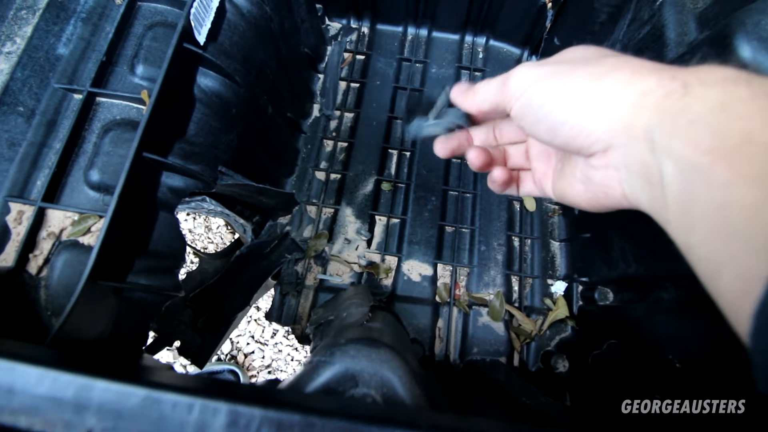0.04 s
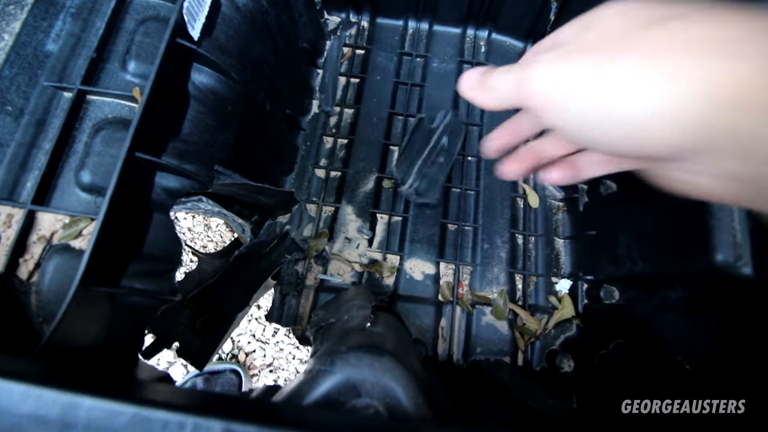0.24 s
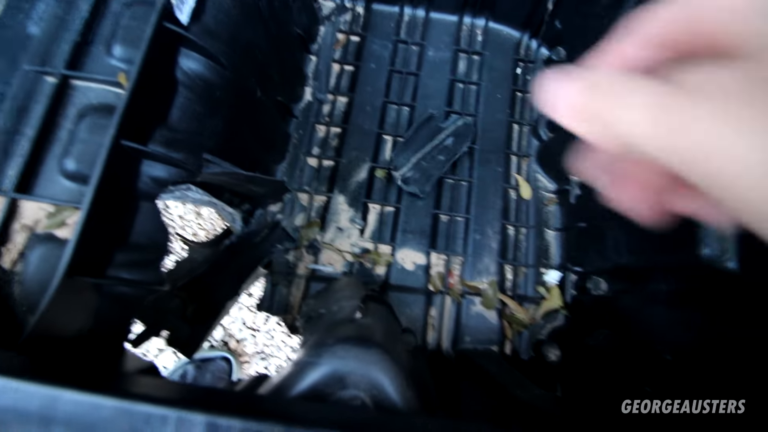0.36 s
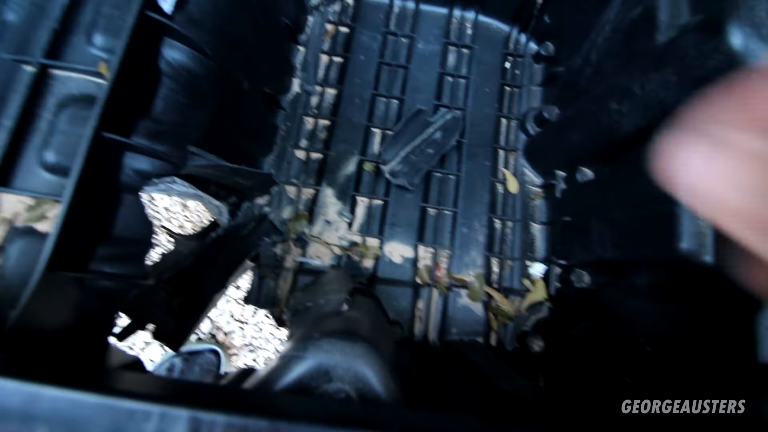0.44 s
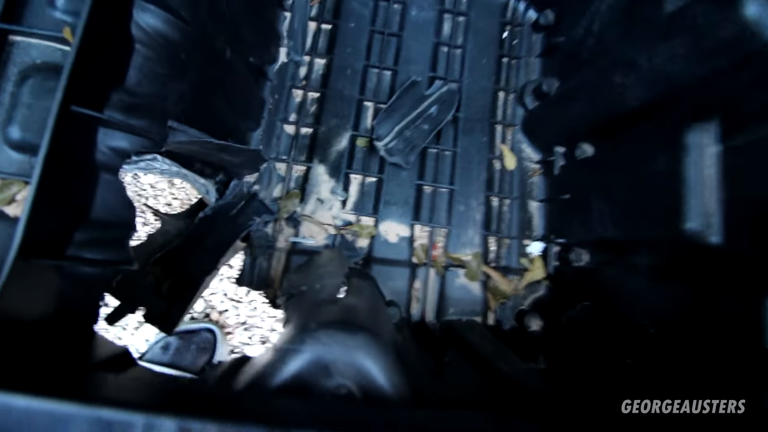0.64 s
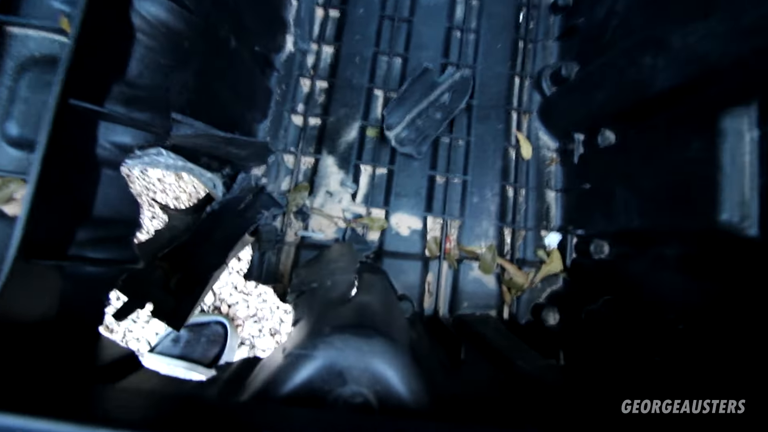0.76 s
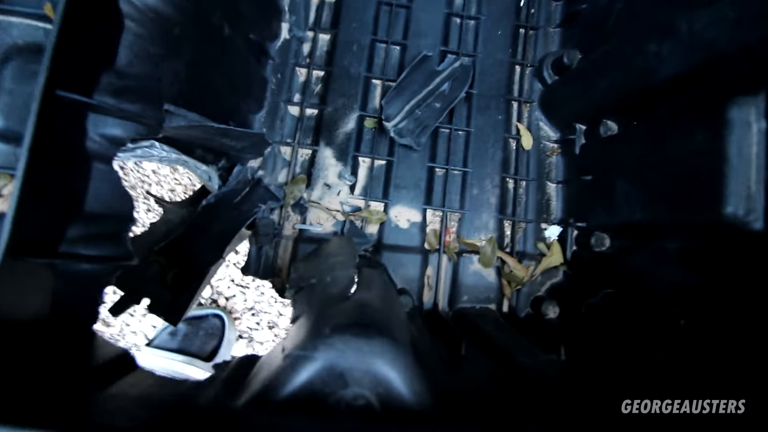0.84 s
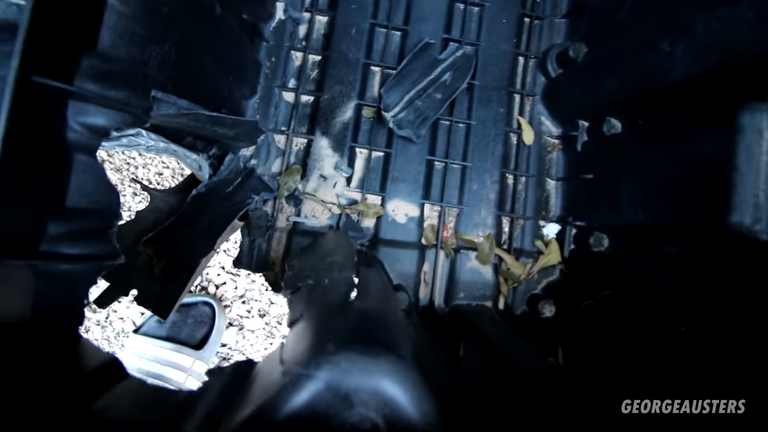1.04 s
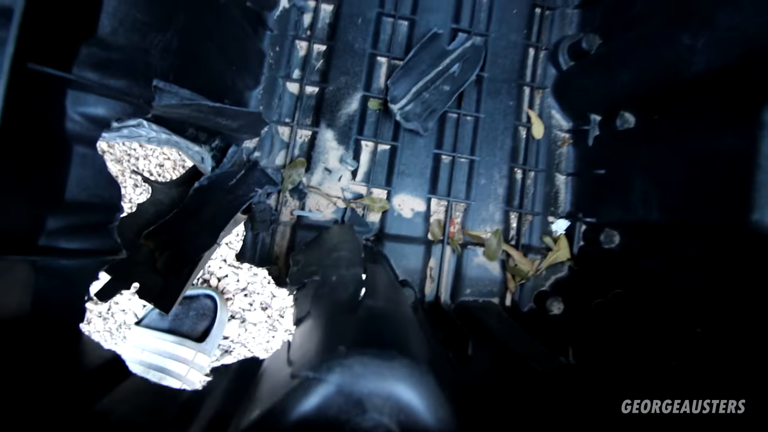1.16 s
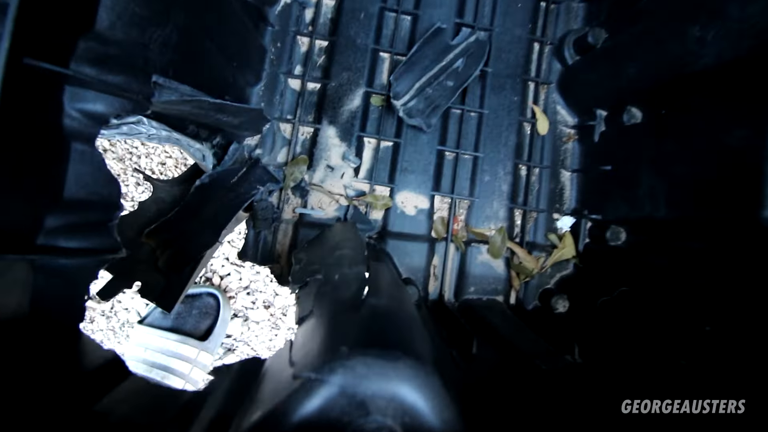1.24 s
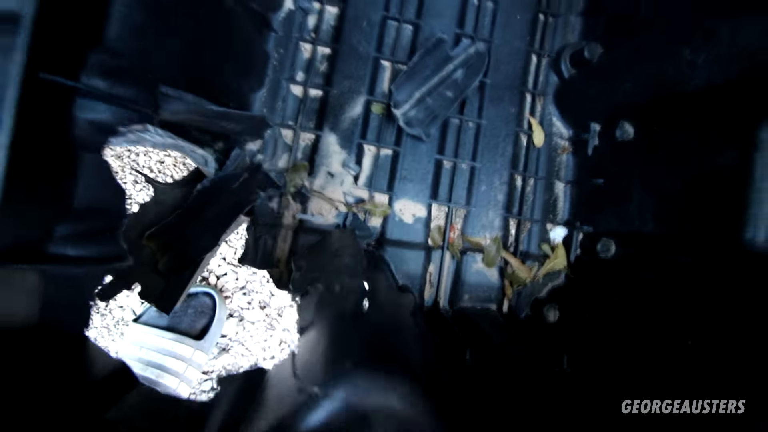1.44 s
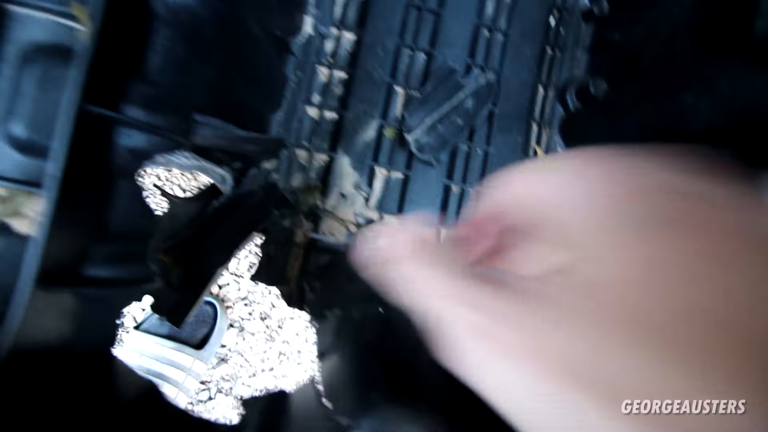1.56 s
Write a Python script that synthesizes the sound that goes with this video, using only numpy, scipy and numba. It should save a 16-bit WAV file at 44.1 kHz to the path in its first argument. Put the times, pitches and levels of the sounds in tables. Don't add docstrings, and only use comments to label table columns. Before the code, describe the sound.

A dropped plastic piece clatters on a hollow ribbed tray. Faint finger squeak and rub until 0.2 s; a loud, slightly overloaded boxy knock at 0.23; sharp, bright cracks and rattling bounces from 0.33 to 0.5, weaker dull taps fading by 0.75. Then quiet outdoor hush, faint low hum swelling near 1.2, slight sleeve rustle, and a soft hand thump and brushing from 1.4. Close, dry.

```python
import sys
import numpy as np
from scipy import signal
from scipy.io import wavfile
from scipy.ndimage import uniform_filter1d
from numba import njit

SR = 44100
rng = np.random.default_rng(int(sys.argv[2]) if len(sys.argv) > 2 else 0)


def store_wav(level_fs):
    pcm = np.round(np.clip(np.atleast_2d(level_fs), -1, 1) * 32767)
    wavfile.write(sys.argv[1], SR, pcm.T.astype(np.int16))


def gain_from_decibels(decibels):
    exponent = np.asarray(decibels, float) / 20
    return 10 ** exponent


N = 70560
T = np.arange(8192) / SR

# (time [s], boom level [dB], boom pitch [Hz], upper-mode level [dB], boom T60 [s])
KNOCKS = [(0.2294, 21, 410.2, -1.5, 0.042), (0.2521, -9, 390, -42, 0.057), (.266, -12, 406, -35.5, .05),
          (.287, -10.5, 413, -53, .05), (0.315, -20, 417, -57, 0.064), (0.3338, 1.5, 401, -14, 0.041),
          (0.352, 8, 440, -8, 0.044), (0.364, 0, 416, -15, 0.057), (.377, -5.5, 448, -19, .05),
          (.398, -17, 417, -35, 0.088), (0.417, -14, 404, -24.5, 0.047), (.437, -21.5, 391, -34.5, 0.074),
          (0.4609, -2.5, 410, -19, 0.046), (0.4676, -8, 398, -20, .05), (0.479, 7.5, 417.5, -6.5, 0.057),
          (0.517, -0.5, 451, -22, 0.066), (.529, -7, 449, -20, 0.09), (0.5381, -6.5, 425, -32, 0.063),
          (0.559, -17, 426, -37.5, 0.13), (0.5843, 0.5, 440, -22.5, 0.067), (0.5947, -6, 450, -30, 0.044),
          (0.6036, -9.5, 430, -29, 0.035), (0.6232, 1, 433.6, -24.5, 0.057),
          (0.6508, -6.5, 454, -34.5, 0.042), (0.6687, -6, 457, -38, 0.034), (.683, -10, 431, -36.5, 0.044),
          (0.7033, -20, 428, -47.5, 0.042), (0.7509, -30, 420, -38, 0.057)]
# (frequency [Hz], level re boom [dB], T60 [s])
LOW_MODES = [(116, -23, 0.072), (172.3, -17, 0.072), (270.3, -16.5, 0.092), (331.2, -13.5, 0.074),
             (475, -16.5, 0.072)]
# (frequency [Hz], level [dB], T60 [s])
UPPER_MODES = [(667, -12.5, 0.051), (752, -8, 0.12), (845, -6.5, 0.074), (898, -11, 0.046),
               (972, 11, 0.014), (1112, 2, 0.02), (1220, -12, 0.065), (1450, -15, 0.052),
               (1679, -3.5, 0.025)]
# (time [s], level [dB], pitch [Hz], T60 [s])
PINGS = [(.2296, 8.5, 1414, 0.0069), (.2299, 6, 3240, 0.0056), (.2301, 1, 820, .03), (.231, 0, 1068, 0.035),
         (.239, -8, 1220, 0.042), (.241, -24, 2600, 0.029), (.335, -11, 1090, 0.034),
         (.352, 2.5, 1215, 0.019), (0.3514, 1.5, 3480, .012), (0.363, -9, 5600, .012),
         (.367, -9.5, 2060, 0.021), (.3765, -20, 3640, 0.01), (.418, -21, 2620, 0.016),
         (0.4647, -6.5, 1180, 0.019), (.470, -24, 5350, 0.011), (.479, -6, 1160, 0.0095),
         (0.48, -17, 5400, 0.01), (0.4896, -3.5, 3180, 0.013), (.4893, -12, 4400, 0.0092),
         (0.489, -9, 7860, 0.014), (0.498, -17, 3040, 0.013), (.516, -22, 950, 0.033),
         (.529, -12, 910, 0.026), (.529, -24, 1190, .025), (.540, -21, 960, 0.027),
         (.5845, -13.5, 930, 0.037), (.584, -25, 1820, 0.019), (.592, -16, 720, 0.039),
         (.598, -28, 980, .03), (.624, -14.5, 887, 0.029), (.628, -23, 1130, 0.039),
         (.630, -17, 730, 0.034), (.637, -27, 800, 0.033), (.6515, -17.5, 848, 0.037),
         (.650, -28.5, 1157, 0.036), (.669, -19.5, 723, 0.035), (.683, -23.5, 904, 0.031),
         (.690, -26.5, 736, .03), (.739, -42, 1030, 0.022), (1.428, -30.5, 1890, 0.04),
         (1.458, -31, 1510, .035), (1.458, -34, 1010, 0.041), (1.4886, -31, 2020, 0.034),
         (1.502, -30, 2100, 0.036)]
# (time [s], level [dB],
# pitch [Hz], T60 [s])
THUMPS = [(.266, -8.5, 413, .1), (.287, -13.5, 417.3, 0.095), (.562, -18, 278, 0.07),
          (.706, -20, 300, 0.015), (.719, -28.5, 421, .1), (0.757, -24, 306, 0.11),
          (0.838, -30, 320, 0.055), (1.41, -20, 294, 0.027), (1.4234, -9, 274, 0.025),
          (1.447, -19.5, 430, 0.042), (1.496, -28, 154, 0.11), (1.505, -24, 243, 0.067),
          (1.543, -20.5, 145, 0.042)]
# (time [s], crack level [dB], rattle level [dB], tilt [dB per octave], rattle T60 [s])
CRACKS = [(0.2306, -12, -23, 6, 0.026), (0.301, -52, -48, 4, 0.39), (0.3342, -14.5, -20, 2, 0.033),
          (0.3516, 9.5, -2.5, -0.5, 0.041), (0.3642, 5.5, -5, 5, 0.035), (.376, -1.5, -16.5, -2.5, 0.054),
          (.4180, -22, -27.5, -7.5, 0.11), (0.4616, -11.5, -21, -3.5, 0.1), (0.4688, -30, -27, 0, 0.14),
          (0.4797, -5, -27, -34, 0.095), (0.4893, -5, -13, 4, 0.045), (0.499, -12, -38, -11, 0.03),
          (0.5167, -30, -24, -6, 0.051), (0.5274, -34, -24, -6.5, 0.039), (0.5392, -31, -41, -5, 0.15),
          (0.585, -26.5, -31, -1, 0.059), (0.594, -29, -40, -1, 0.26), (0.624, -39, -41.5, 2.5, 0.32),
          (0.651, -24, -34, -9, 0.05), (0.7025, -36, -45, -9, 0.053), (0.7523, -52, -38, -6, 0.041),
          (0.952, -37, -58, -6, 0.012)]
# (frequency [Hz], width [Hz], level [dB])
PIECE_MODES = [(1850, 160, 12), (2203, 170, 12.5), (2990, 740, 9.5), (3510, 520, 8), (4390, 130, 14),
               (5140, 800, 8), (5600, 250, -17), (6900, 250, 7.5), (7730, 47, 11), (9110, 1120, -4),
               (10470, 570, -8.5), (12400, 2200, -14)]
# (time [s], level [dB])
RUSTLE = [(0.72, -55), (0.742, -52.5), (0.756, -43), (0.768, -59), (0.776, -43.5), (0.812, -55),
          (0.836, -43.5), (0.91, -54), (0.916, -69), (0.984, -70), (1.09, -46), (1.122, -45.5),
          (1.136, -41.5), (1.152, -47), (1.346, -61), (1.442, -34), (1.552, -42), (1.6, -43)]
# (frequency [Hz], level [dB per Hz])
CLOTH = [(300, -9), (500, -12.5), (1400, -19), (2600, -15.5), (4500, -16), (7500, -19.5), (16000, -38.5)]
# (time [s], level [dB])
BRUSH = [
    (1.39, -52),
    (1.41, -48),
    (1.43, -33),
    (1.465, -28.5),
    (1.48, -56),
    (1.51, -32),
    (1.54, -61),
    (1.6, -70),
]
# (frequency [Hz], level [dB per Hz])
TRIM = [(150, -29), (300, 0), (700, -9), (1500, -10.5), (2100, -3), (2600, -17), (5000, -14.5),
        (16000, -26)]
# (time [s], level [dB])
SLIP = [
    (0, -49),
    (.022, -44),
    (.05, -47),
    (.105, -46),
    (.12, -42),
    (.145, -37),
    (.152, -45),
    (.19, -60),
    (.22, -93),
]
# (frequency [Hz], width [Hz], level [dB])
SQUEAK = [(2950, 240, -12), (4950, 82, -1.5), (6400, 72, -4), (7320, 46, -6)]
# (frequency [Hz], level [dB per Hz])
HUSH = [(30, -10), (133, -4), (260, -4), (1000, -12.5), (1650, -14.5), (2200, -24.5), (5000, -19),
        (14000, -41)]
# (time [s], level [dB])
HUM_SWELL = [
    (0, -3.5),
    (.8, -1.5),
    (.92, 2.5),
    (1.2, 6.5),
    (1.35, 2),
    (1.6, -7),
]

PUSH_S, BOOM_RISE_S, THUMP_RISE_S = 0.0011, 0.00077, 0.0048
PAIR_RATIO, PAIR_DB, PAIR_T60_S = 1.12, -17, 0.091
HARD_DAMP = 0.15
MODE_JITTER, LOW_SCATTER_DB, UPPER_SCATTER_DB = 0.035, 3.5, 4
CLATTER_DB, CLATTER_T60_S = -1.5, 0.059
NOTCH_HZ, NOTCH_WIDTH_HZ, NOTCH_DEPTH = 594.0, 272.0, 0.89
PING_RISE_CYCLES, PING_SAG, SAG_S = 0.88, 0.079, 0.011
CRACK_T60_S, TILT_HZ = 0.0081, 3500
HUSH_DB, HUM_HZ, HUM_DB, MIC_HISS_DB = -41.5, 131.7, -45.5, -56.5
MIC_LOW_HZ, SETTLE_HZ, TOP_HZ = 73.6, 40.5, 15750
LIMIT_DB, RATIO, ATTACK_S, RELEASE_S = -17, 2.74, 0.0015, 0.046
CLIP, OVERLOAD_DB = 0.87, 6


@njit
def svf(x, hz, width):
    y, b, l = np.empty(len(x)), 0., 0.
    g, k = np.tan(np.pi * hz / SR), width / hz
    for i in range(len(x)):
        v = (b + g * (x[i] - l)) / (1 + g * (g + k))
        b, l, y[i] = 2 * v - b, l + 2 * g * v, k * v
    return y


def resonate(x, hz, width):
    return svf(svf(x, 1. * hz, 1. * width), 1. * hz, 1. * width)


@njit
def follow(x, attack, release):
    y, e = np.empty(len(x)), 1e-6
    for i in range(len(x)):
        e += (abs(x[i]) - e) * (attack if abs(x[i]) > e else release)
        y[i] = e
    return y


def unit(x):
    return x / np.sqrt(np.mean(x ** 2))


def walk(rate):
    k = int(SR / rate)
    held = np.repeat(rng.standard_normal(N // k + 1), k)
    return unit(uniform_filter1d(uniform_filter1d(held, k), k)[:N])


def coloured(spectrum, flicker_db, grit_db):
    hz_at, db_at = np.array(spectrum, float).T
    grit = gain_from_decibels(grit_db * rng.exponential(size=N))
    out = 0
    for hz in 35 * 2 ** (np.arange(18) / 2):
        db = np.interp(np.log(hz), np.log(hz_at), db_at) + flicker_db * walk(14.58)
        grains = rng.standard_normal(N) * grit
        out = out + gain_from_decibels(db) * resonate(grains, hz, hz / 2)
    return unit(out)


def curve(table):
    s, db = np.array(table, float).T
    return gain_from_decibels(np.interp(np.arange(N) / SR, s, db, left=-90))


def add(out, s, x):
    i = int(s * SR)
    out[i:i + len(x)] += x[:N - i]


def fade(t60):
    return np.exp(-np.log(1000) * T / t60)


def rise(seconds):
    return 1 - np.exp(-T / seconds)


def ring(hz, db, t60, side=1.):
    return -np.sign(side) * gain_from_decibels(db) * np.sin(2 * np.pi * hz * T) * fade(t60)


def tray_knocks():
    out = np.zeros(N)
    for s, db, hz, upper_db, t60 in KNOCKS:
        damping = gain_from_decibels(-HARD_DAMP * db)
        blow = ring(hz, db, t60) + ring(hz * PAIR_RATIO, db + PAIR_DB, PAIR_T60_S * damping)
        blow *= rise(BOOM_RISE_S)
        for f, d, t in LOW_MODES:
            detune, scatter = rng.standard_normal(2)
            blow += ring(f * (1 + MODE_JITTER * detune), db + d + LOW_SCATTER_DB * scatter, t * damping)
        for f, d, t in UPPER_MODES:
            detune, scatter = rng.standard_normal(2)
            level = upper_db + d + UPPER_SCATTER_DB * scatter
            blow += ring(f * (1 + MODE_JITTER * detune), level, t, detune)
        clatter = unit(resonate(rng.standard_normal(len(T)), 860, 960))
        blow += gain_from_decibels(upper_db + CLATTER_DB) * clatter * fade(CLATTER_T60_S)
        add(out, s, blow * rise(PUSH_S) ** 2)
    return out - NOTCH_DEPTH * svf(out, NOTCH_HZ, NOTCH_WIDTH_HZ)


def panel_pings():
    out = np.zeros(N)
    for s, db, hz, t60 in PINGS:
        sagged_time = T - PING_SAG * (T - SAG_S * rise(SAG_S))
        swing = np.sin(-2 * np.pi * hz * sagged_time)
        add(out, s, gain_from_decibels(db) * swing * fade(t60) * rise(PING_RISE_CYCLES / hz))
    return out


def soft_thumps():
    out = np.zeros(N)
    for s, db, hz, t60 in THUMPS:
        add(out, s, ring(hz, db, t60) * rise(THUMP_RISE_S))
    return out


def piece_colour(x, tilt_db, broadening):
    bands = 0
    for f, width, d in PIECE_MODES:
        level = d + tilt_db * np.log2(f / TILT_HZ)
        bands = bands + gain_from_decibels(level) * resonate(x, f, broadening * width)
    return unit(bands)


def piece():
    out = np.zeros(N)
    for s, db, rattle_db, tilt_db, t60 in CRACKS:
        burst, chance = rng.standard_normal((2, len(T)))
        grit = chance * gain_from_decibels(5.6 * np.abs(burst))
        crack = gain_from_decibels(db) * piece_colour(burst, tilt_db, 2.26) * fade(CRACK_T60_S)
        rattle = gain_from_decibels(rattle_db) * piece_colour(grit, tilt_db, 1.35) * fade(t60)
        add(out, s, crack + rattle)
    return out


def finger_slip():
    noise = rng.standard_normal(N)
    squeak = 0.3 * svf(noise, 3650.0, 2700.0)
    for f, width, d in SQUEAK:
        squeak = squeak + gain_from_decibels(d) * svf(noise, 1. * f, 1.3 * width)
    return curve(SLIP) * unit(squeak)


def sleeve():
    return gain_from_decibels(4.5) * curve(RUSTLE) * coloured(CLOTH, 2.7, 2.76)


def trim_brush():
    return curve(BRUSH) * coloured(TRIM, 1.1, 3.05)


def hum():
    phase = 2 * np.pi * np.cumsum(HUM_HZ * (1 + 0.024 * walk(15))) / SR
    return gain_from_decibels(HUM_DB) * curve(HUM_SWELL) * np.sin(phase) * gain_from_decibels(1.3 * walk(24.8))


def hush():
    return gain_from_decibels(HUSH_DB) * coloured(HUSH, 2, 0.22) + gain_from_decibels(MIC_HISS_DB) * rng.standard_normal(N)


def scene():
    blows = tray_knocks() + panel_pings() + soft_thumps() + piece()
    hands = finger_slip() + sleeve() + trim_brush()
    return (gain_from_decibels(4.0) * blows + hands + hum() + hush())[None]


def low_pass(x):
    return signal.sosfilt(signal.butter(12, 16820, fs=SR, output="sos"), x)


def record(dry):
    dry = signal.sosfilt(signal.butter(4, MIC_LOW_HZ, "high", fs=SR, output="sos"), dry)
    envelope = follow(dry[0], 1 / (ATTACK_S * SR), 1 / (RELEASE_S * SR))
    gain = np.minimum(1, gain_from_decibels(LIMIT_DB) / envelope) ** (1 - 1 / RATIO)
    limited = signal.sosfilt(signal.butter(2, SETTLE_HZ, "high", fs=SR, output="sos"), dry * gain)
    clipped = np.clip(limited, -CLIP, CLIP)
    excess = np.abs(limited - clipped).clip(0, 1)
    clipped = clipped - gain_from_decibels(OVERLOAD_DB) * uniform_filter1d(excess, size=131, origin=50)
    clipped = np.clip(clipped, -CLIP, CLIP)
    wet = signal.sosfilt(signal.ellip(9, .3, 42, TOP_HZ, fs=SR, output="sos"), clipped)
    return low_pass(wet)


dry = scene()
out = record(dry)
store_wav(out)
```